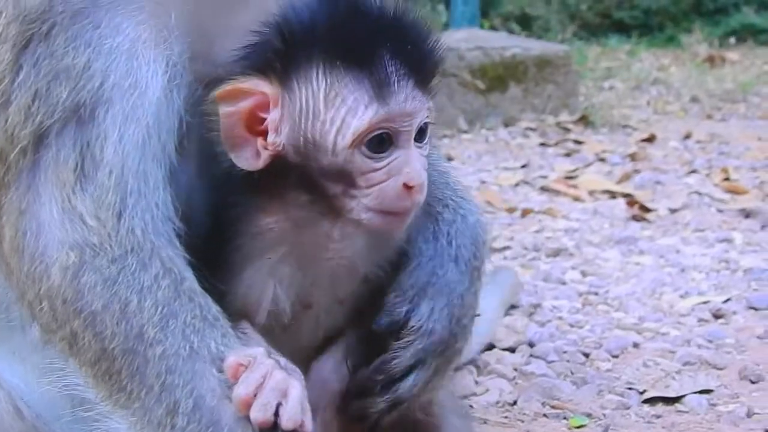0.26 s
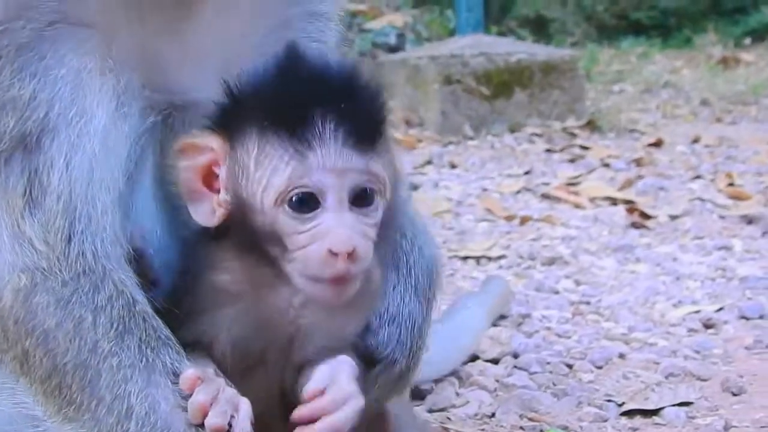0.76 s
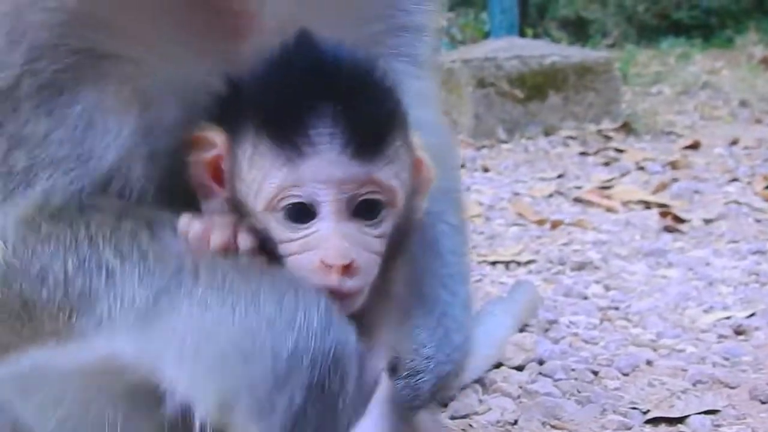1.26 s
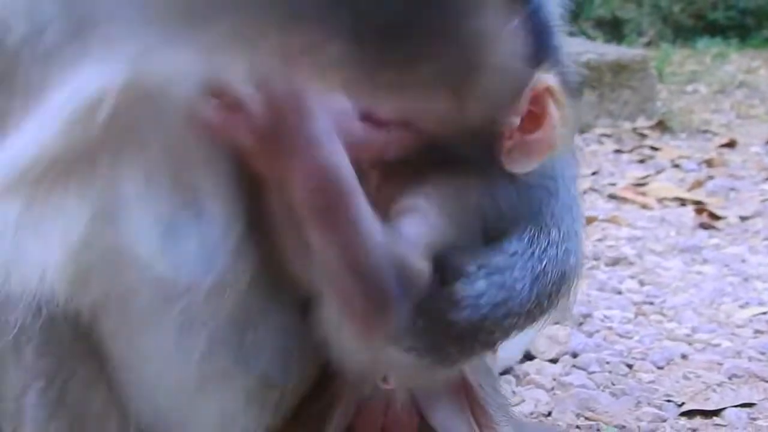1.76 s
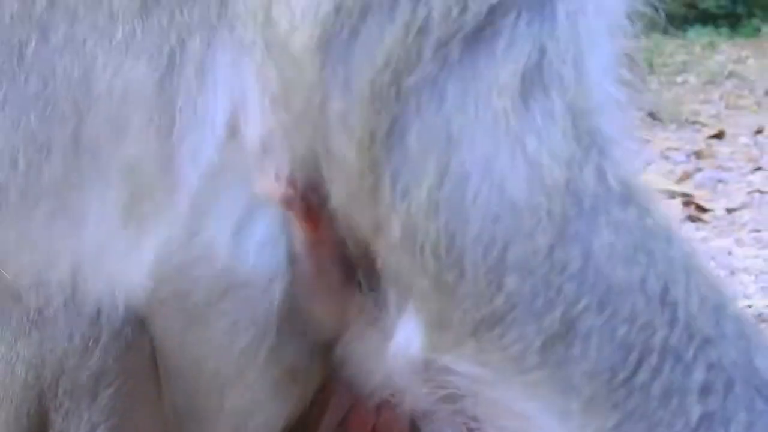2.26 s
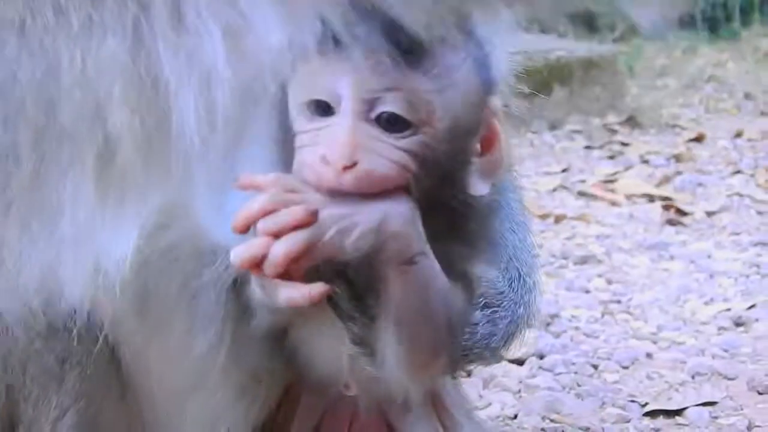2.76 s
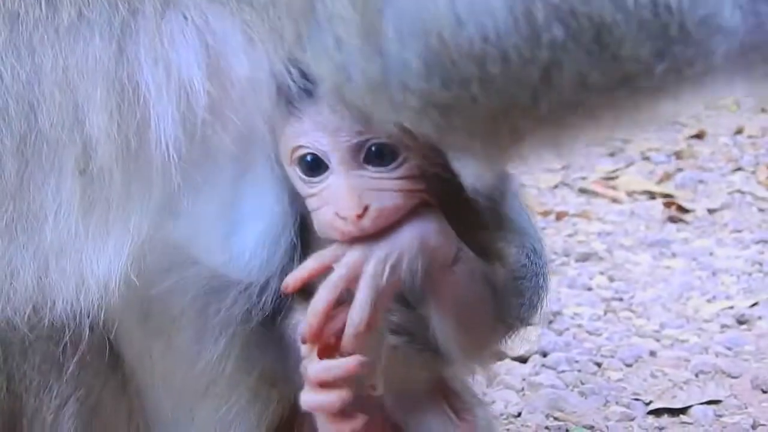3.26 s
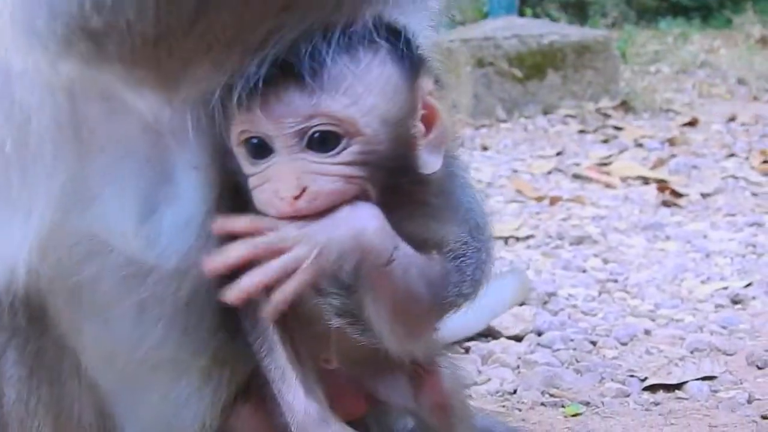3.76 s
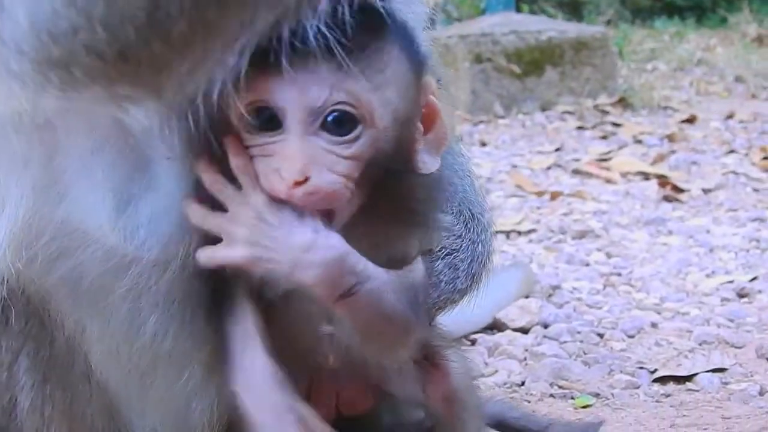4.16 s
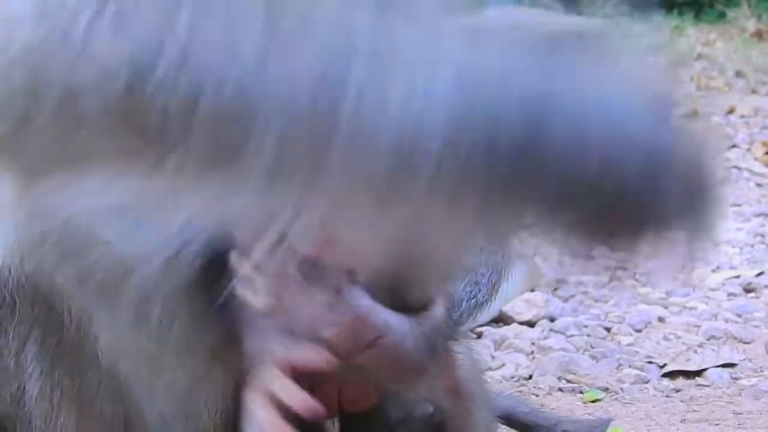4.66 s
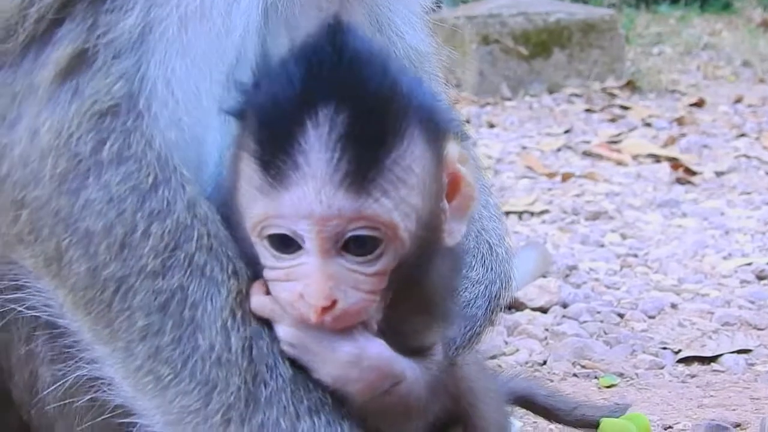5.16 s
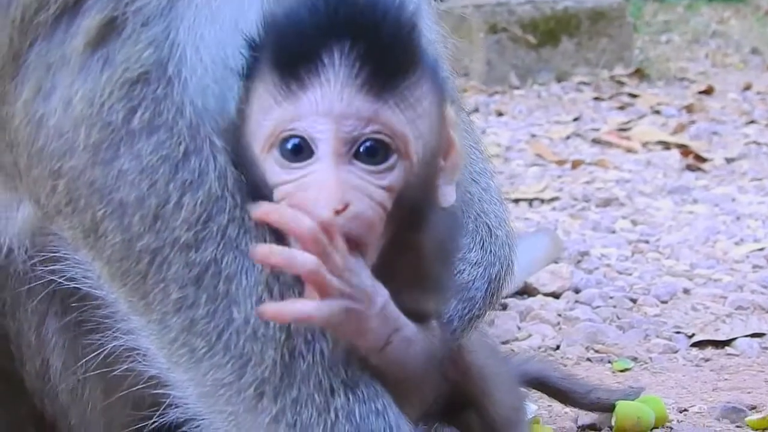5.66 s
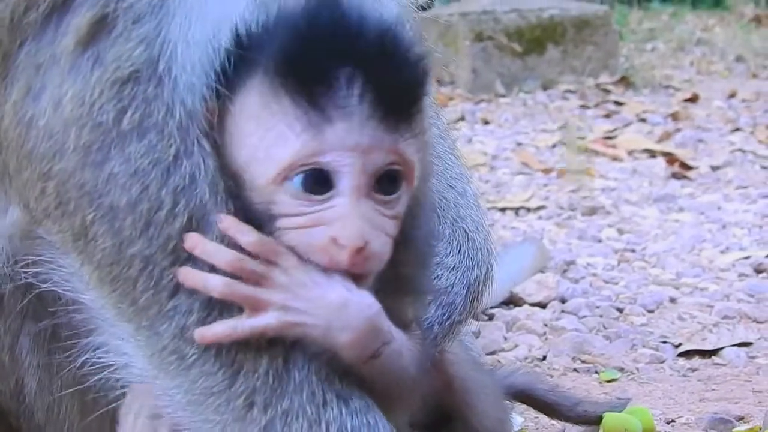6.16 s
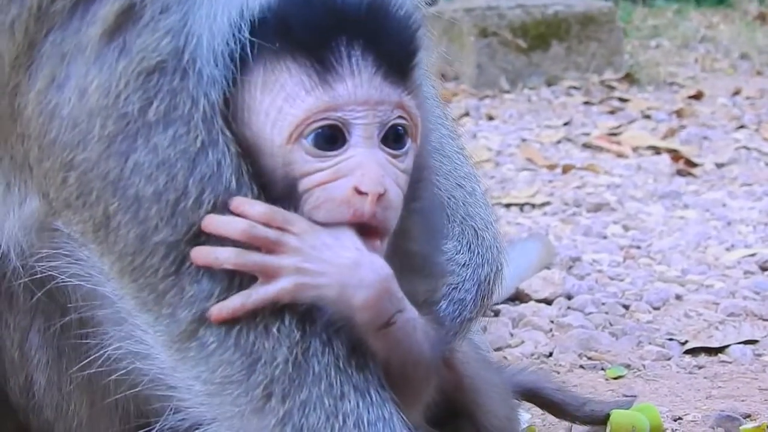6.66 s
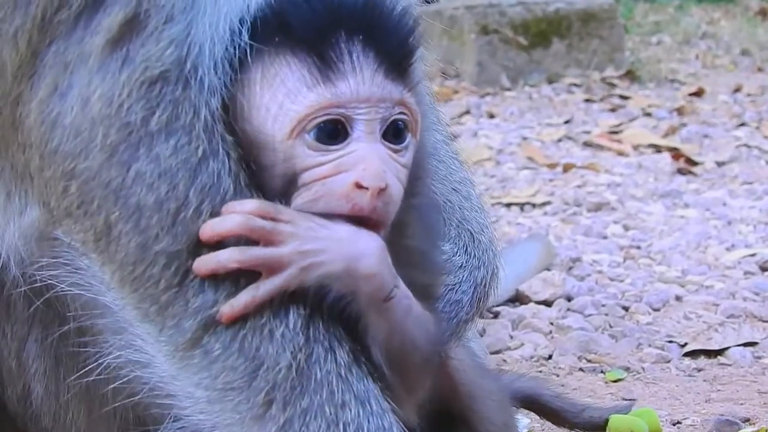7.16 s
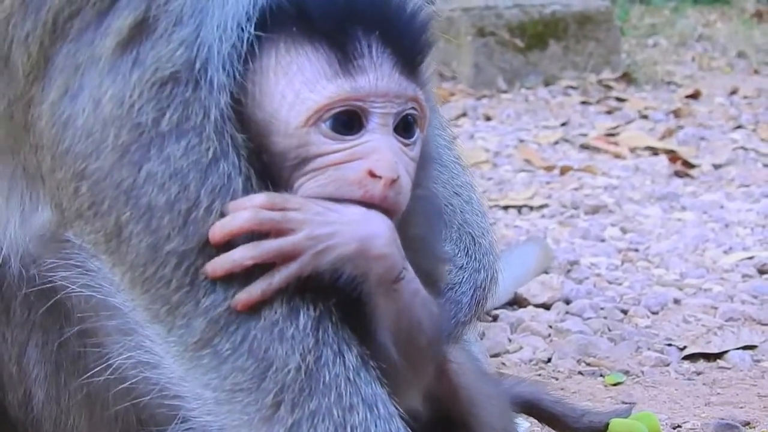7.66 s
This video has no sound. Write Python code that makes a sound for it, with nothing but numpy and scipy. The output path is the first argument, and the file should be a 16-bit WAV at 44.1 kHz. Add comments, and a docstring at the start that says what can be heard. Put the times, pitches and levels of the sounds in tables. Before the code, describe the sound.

A quiet stony clearing by a road, with a steady low rumble of distant traffic and a faint, wavering insect whine throughout. At the start a single-cylinder motorbike chugs away, its lumpy low beat loudest in the first second, then thinner, echoing off trees and mostly gone by 5.5 seconds. A soft bump and tiny gritty scuffs sound close by between 0.3 and 0.6 seconds, with another bump near 5.5. A second motorbike drones closer, swelling from about 5 seconds and passing at around 6.4 with booming exhaust pulses, tyre roar, a rasping growl, brief gear whines and ticking valves. Its pitch drops as it goes by and it begins to fade. A few small crunches of grit come near 7.8 seconds. The left side of the microphone is covered, so nearly everything is heard on the right, with faint hiss on both sides.

```python
"""A quiet stony clearing by a road: one single-cylinder motorbike chugs away, another comes up and passes.
Exhaust pulses boom through the silencers over tyre roar and echo off the trees. The passing bike clears
the bushes and drops in pitch as it goes by, its cavities growling, gears whining and valves ticking.
Insects whine in the trees, grit stirs close by and distant traffic rumbles. The left microphone port
is covered, so nearly everything but the hiss is heard on the right."""
import sys
import numpy as np
from scipy import signal
from scipy.fft import rfft, irfft, next_fast_len
from scipy.io import wavfile
from scipy.ndimage import uniform_filter1d, map_coordinates

SR = 44100
rng = np.random.default_rng(int(sys.argv[2]) if len(sys.argv) > 2 else 0)


def generate_wav(sig):
    """Save sig (samples, or channels by samples) to the path in sys.argv[1] as 16-bit PCM at SR."""
    pcm = np.round(np.clip(np.atleast_2d(sig).T, -1, 1) * 32767).astype(np.int16)
    wavfile.write(sys.argv[1], SR, pcm)


N = 348831
TIME = np.arange(N) / SR
CLOSEST_S, SPEED_M_S, DISTANCE_M = 6.38, 15.2, 5.3  # the passing bike's straight line

# road roar of both bikes: f/Hz, relative level/dB
ROAR_EQ = [(25, -23.5), (50, 3), (90, 12), (160, 9.5), (230, 3.5), (310, -1), (420, 0), (520, -4.5),
           (630, -8.5), (770, -19.5), (1100, -19), (2000, -50.5), (8000, -80.5)]


def undb(db):
    """Decibels to gain."""
    return 10 ** (np.asarray(db) / 20)


def unit(x):
    """Scale to an rms of one."""
    return x / np.sqrt(np.mean(x ** 2))


def automation(points):
    """Join (t/s, value) points with straight lines."""
    return np.interp(TIME, *np.transpose(points))


def colour(x, points):
    """Minimum-phase EQ through (f/Hz, gain/dB) points, built from the cepstrum."""
    size = next_fast_len(N + SR // 2) * 2
    hz, db = np.transpose(points)
    gain = undb(np.interp(np.log(np.fft.rfftfreq(size, 1 / SR) + 1), np.log(hz), db))
    cepstrum = irfft(np.log(gain))[:size // 2]
    cepstrum[1:] *= 2
    return irfft(rfft(x, size) * np.exp(rfft(cepstrum, size)))[..., :N]


def shade(x, points):
    """Zero-phase EQ through (f/Hz, gain/dB) points."""
    hz, db = np.transpose(points)
    size = next_fast_len(N + SR // 2)
    gain = undb(np.interp(np.fft.rfftfreq(size, 1 / SR), hz, db))
    return irfft(rfft(x, size) * gain, size)[:N]


def band(x, hz, width_hz):
    """A steep band-pass around one resonance."""
    spread = 1 + width_hz / hz / 2
    edges = [hz / spread, min(hz * spread, SR / 4)]
    return signal.sosfilt(signal.butter(3, edges, "band", fs=SR, output="sos"), x)


def noise(points):
    """Coloured noise, unrelated left and right."""
    return unit(colour(rng.standard_normal((2, N)), points))


def drift(rate_hz):
    """Smooth random modulation: stepped levels, slewed twice."""
    hold = int(SR / rate_hz)
    steps = np.repeat(rng.standard_normal(N // hold + 2), hold)
    return unit(uniform_filter1d(uniform_filter1d(steps, hold), hold)[:N])


def strokes(hz, lag, scatter_db, jitter_s):
    """One pulse per engine cycle, lag cycles late, each with its own size and timing."""
    cycles = np.cumsum(hz) / SR - lag
    chance = rng.standard_normal((N // 1000, 2))[:int(cycles[-1]) + 1]
    onsets_s = np.interp(np.arange(len(chance)), cycles, TIME) + jitter_s * chance[:, 0]
    return np.bincount(np.clip(onsets_s * SR, 0, N - 1).astype(int), undb(scatter_db * chance[:, 1]), N)


def tail(x, decay_s):
    """Give every pulse an exponential tail."""
    return signal.lfilter([1], [1, -np.exp(-1 / (decay_s * SR))], x)


def rasp(hz):
    """A rough scrape that repeats almost exactly on every engine cycle."""
    grain = rng.standard_normal(SR // 30)
    pulses = strokes(hz, lag=.1, scatter_db=2, jitter_s=.00008)
    return unit(signal.fftconvolve(pulses, grain)[:N])


def along():
    """Metres that the passing bike has gone beyond its closest point."""
    return SPEED_M_S * (TIME - CLOSEST_S)


def nearness():
    """Least distance over present distance of the passing bike."""
    return DISTANCE_M / np.hypot(DISTANCE_M, along())


def rear_view():
    """From -1 with the passing bike head on to 1 with it seen from behind."""
    return along() / np.hypot(DISTANCE_M, along())


def passing_rate():
    """Firing rate as heard: a slowly sagging engine, Doppler-shifted by its motion."""
    firing_hz, sag_hz_per_s = 31.4, .1377
    return (firing_hz - sag_hz_per_s * TIME) / (1 + SPEED_M_S / 343 * rear_view())


def steady_rate():
    """The passing bike's mean firing rate, for layers that are pitch-bent afterwards."""
    return np.full(N, passing_rate().mean())


def doppler(x):
    """Varispeed that follows the heard firing rate: higher coming, lower going."""
    hz = passing_rate()
    position = np.cumsum(hz / hz.mean())
    return np.array([map_coordinates(channel, [position], order=3, mode="nearest") for channel in x])


def beamed(part):
    """Boost or dip in dB as a part of the passing bike sweeps its side lobes past."""
    # lobes of each part: t/s, half width/s, gain/dB
    lobes = {"roar": [(6.25, .6, 1.5)], "clatter": [(6.24, .1, 11)], "valves": [(5.81, .15, 12),
             (6.17, .08, 12)], "airbox": [(6.11, .07, 4.5), (6.32, .05, 2.5), (6.6, .2, 4)],
             "tailpipe": [(6.2, .6, -5)], "gearcase": [(6.1, .05, 4), (6.31, .2, 12)],
             "intake": [(5.86, .13, 6), (6.11, .05, 6)]}
    return sum(db / (1 + np.abs((TIME - s) / half_s) ** 3) for s, half_s, db in lobes.get(part, []))


def carried(part):
    """Gain of a part of the passing bike, from its distance, the side it shows and the bushes between."""
    # each part: base level/dB, loss per doubled distance/dB, rearward gain/dB, loss behind bushes/dB
    reach = {"exhaust": (-15, 7, 1.5, -2), "roar": (-28.5, 5.5, -1.1, -3.5), "tyres": (-48.5, 4, 0.5, 4),
             "tread": (-46.5, 5, -1.5, 4.5), "clatter": (-56, 10, -5.5, -6.5), "valves": (-63, 13, -3, -1),
             "airbox": (-39.5, 5, -3.5, 3.5), "tailpipe": (-44.5, 3.5, 7.5, -3.5),
             "gearcase": (-52, 7.5, -3, 13), "intake": (-51, 11, -7, 17)}
    db, loss_db, rear_db, bushes_db = reach[part]
    emerges_s, crossfade_s = 4.94, .096
    hidden = .5 - .5 * np.tanh((TIME - emerges_s) / crossfade_s)
    open_db = db + loss_db * np.log2(nearness()) + rear_db * rear_view() + beamed(part)
    return undb(open_db - bushes_db * hidden)


def tree_echoes(x):
    """Reflections that come and go as a bike moves past the trees."""
    # echo taps: delay/s, rms gain/dB
    taps = [(0.019, -11.5), (0.028, -8.5), (0.052, -7)]
    return sum(undb(db) * drift(5) * np.interp(TIME - delay_s, TIME, x) for delay_s, db in taps)


def distant_traffic():
    """A steady bed of low rumble from far-off traffic."""
    # rumble: f/Hz, relative level/dB
    rumble_eq = [(20, -61), (38, -20.5), (52, -1), (85, -5), (135, -0.5), (170, -0.5), (210, -17),
                 (290, -16), (400, -34.5), (2000, -65)]
    return noise(rumble_eq) * undb(-33)


def insects():
    """Thin whines that waver in pitch, flutter in level through the leaves and slowly ease off."""
    # each insect: f/Hz, wander/Hz, tremble/Hz, fade/(dB/s), starting level/dB of harmonics 1, 2 and 3
    voices = [(2296, 6, 14, .6, -62, -64.5, -87), (2314, 2, 6, .2, -69, -66, -90),
              (2218, 8, 30, .3, -74, -76, -98)]
    out = np.zeros(N)
    for hz, wander_hz, tremble_hz, fade_db_per_s, *partials_db in voices:
        phase = 2 * np.pi * np.cumsum(hz + wander_hz * drift(14) + tremble_hz * drift(120)) / SR
        for k, db in enumerate(partials_db, 1):
            out += unit(np.sin(k * phase) * undb(3 * drift(70))) * undb(db - fade_db_per_s * TIME)
    return out


def scuffs():
    """Brief bursts of grit and soft bumps close by, each ringing in one broad band."""
    # each scuff: t/s, peak level/dB, f/Hz, width/Hz, decay/s
    hits = [(0.251, -17, 170.5, 69, 0.0029), (0.283, -47, 1370, 403, 0.017), (0.382, -48, 1560, 350, 0.018),
            (.555, -41, 1550, 770, 0.002), (5.453, -15, 153, 79, 0.0062), (7.756, -35, 1700, 950, 0.0097),
            (7.769, -45.5, 3800, 1000, 0.0028), (7.769, -46, 6260, 2200, .005),
            (7.776, -43, 4100, 900, 0.0022), (7.863, -41, 1600, 1600, 0.003),
            (7.875, -44, 4520, 2970, 0.0037)]
    age = np.arange(SR // 8) / SR
    out = np.zeros(N)
    for s, db, hz, width_hz, decay_s in hits:
        burst = band(rng.standard_normal(len(age)) * np.exp(-age / decay_s), hz, width_hz)
        start = int(s * SR)
        out[start:start + len(age)] += (undb(db) * burst / np.abs(burst).max())[:N - start]
    return out


def leaving_bike():
    """A lumpy chug: a strong exhaust beat with a puff of roar, then a weak intake gulp half a cycle on."""
    # the engine eases off, idles along, then picks up a little: t/s, firing rate/Hz
    revs = [(0, 26.2), (1.2, 24.2), (2, 23.95), (4.7, 24.1), (6, 25.4)]
    # loudness of the chug as it draws away: t/s, level/dB
    loudness = [(0, -19), (.95, -21.5), (1.7, -29.5), (2.35, -23), (3.4, -30.5), (4.1, -30), (5.1, -27.5),
                (5.7, -41), (7.9, -33.5)]
    # silencer response: f/Hz, gain/dB
    silencer = [(25, -38), (50, -14), (75, 5.5), (100, -2.5), (128, 0.5), (150, -5), (175, -17), (215, -30),
                (310, -36), (400, -44), (600, -56), (4000, -110)]
    hz = automation(revs)
    exhaust = strokes(hz, lag=.5, scatter_db=2, jitter_s=.0003)
    intake = strokes(hz, lag=1, scatter_db=3, jitter_s=.0006)
    beat = colour(exhaust + undb(-11) * intake, silencer)
    # as it draws away, the deep boom thins and the echoes come up
    boom = automation([(1.12, 1), (2.85, .085)])
    full = beat + undb(-7 * boom) * tree_echoes(beat)
    thin = signal.sosfiltfilt(signal.butter(3, 92, "high", fs=SR, output="sos"), full)
    chug = boom * unit(full) + (1 - boom) * unit(thin)
    puffs = unit(tail(exhaust, decay_s=.0068) + .89)
    roar = unit(colour(puffs * rng.standard_normal((2, N)), ROAR_EQ))
    roar_db, fade_db_per_s = -35, 20.5
    return chug * undb(automation(loudness)) + roar * undb(roar_db - fade_db_per_s * TIME)


def rolling_noise():
    """The passing bike's low roar carries far, tyres rush to the rear and tread hiss is thrown forward."""
    # tyre rush: f/Hz, relative level/dB
    tyre_eq = [(400, -23), (680, -2.5), (800, 11.5), (1000, 5.5), (1130, 0), (1280, -8.5), (1600, -20.5),
               (2500, -25.5), (6000, -43.5), (12000, -78.5)]
    # tread hiss: f/Hz, relative level/dB
    tread_eq = [(900, -12), (1250, -3.5), (1400, -6.5), (1490, -3.5), (1580, -6), (2100, -11), (2800, -15),
                (3400, -17), (4600, -11), (6500, -47.5), (12000, -55)]
    gears = rasp(passing_rate())  # chain and gears, heard mostly close by
    out = doppler(noise(tread_eq)) * carried("tread")
    for part, eq, rasp_db in [("roar", ROAR_EQ, -5.5), ("tyres", tyre_eq, -2.5)]:
        rasp_gain = undb(rasp_db) * np.sqrt(nearness())
        blend = doppler(noise(eq)) + rasp_gain * unit(colour(gears, eq))
        out += blend / np.hypot(1, rasp_gain) * carried(part)
    bumps = undb(.9 * drift(30))
    return out * bumps


def gear_whines():
    """Engine, gear and chain tones locked to the passing engine; each is beamed this way for a moment."""
    # each tone: multiple of the firing rate, loudest t/s, spread/s, level there/dB
    tones = [(4, 4.2, .8, -37), (7, 5.4, .25, -45), (7, 6.05, .15, -37), (8.1, 5.7, .2, -43),
             (25.3, 6.22, .12, -44), (36.5, 6.28, .1, -45), (7, 6.62, .1, -38), (8.45, 6.53, .14, -39),
             (13.25, 6.33, .12, -39), (16.25, 6.37, .1, -40), (19.12, 6.09, .1, -41), (20.7, 6.2, .12, -45),
             (18.15, 6.65, .07, -45), (19.1, 7, .15, -51), (24.9, 7.85, .2, -54)]
    cycles = np.cumsum(passing_rate()) / SR
    out = np.zeros(N)
    for order, s, spread_s, db in tones:
        beam = np.exp(-.5 * ((TIME - s) / spread_s) ** 2)
        tone = np.sin(2 * np.pi * order * cycles + .7 * drift(40))
        out += unit(tone * undb(2.5 * drift(30))) * undb(db) * beam
    return out


def valve_gear():
    """A firm tap and a lighter one in each cycle ring the cylinder head and set loose metal rattling."""
    # cylinder head modes: f/Hz, relative level/dB, t60/s
    modes = [(3370, -15, .1), (3615, -6.5, .04), (3822, -4.5, .048)]
    # rattling engine metal: f/Hz, relative level/dB
    metal_eq = [(1500, -36), (2700, -5), (3400, -8), (3650, 0), (3840, 7.5), (4020, -5.5), (4400, -7),
                (5500, -15), (8000, -26.5), (13000, -46.5)]
    firm = strokes(steady_rate(), lag=.52, scatter_db=1.5, jitter_s=.0008)
    light = strokes(steady_rate(), lag=.63, scatter_db=2, jitter_s=.002)
    taps = firm + undb(-9) * light
    age = np.arange(SR // 20) / SR
    ring = sum(undb(db - 60 * age / t60_s) * np.sin(2 * np.pi * hz * age) for hz, db, t60_s in modes)
    ticks = signal.fftconvolve(taps, ring)[:N]
    rattle = (tail(taps, decay_s=.0047) + .49) * noise(metal_eq)
    return unit(doppler([ticks])) * carried("valves") + unit(doppler(rattle)) * carried("clatter")


def growl():
    """A rasping puff of gas in each cycle rings the airbox, tailpipe, gearcase and intake."""
    # resonances of each cavity: f/Hz, width/Hz, gain/dB
    cavities = {"airbox": [(415.8, 64, -2), (505, 54.3, -1), (591, 86, -1), (804.7, 38, -11)],
                "tailpipe": [(386.3, 78, 1), (714.5, 96, -3.5), (1016, 144, -8.5), (1285, 55, -14.5)],
                "gearcase": [(787, 350, -0.5), (1102, 380, -0.5), (1900, 400, -13.5)],
                "intake": [(1003.4, 80, 0), (1426, 130, -0.5), (1886, 69, -13)]}
    firings = strokes(steady_rate(), lag=.4, scatter_db=1.5, jitter_s=.0005)
    flow = tail(firings, decay_s=.018) + .2  # puffs on a steady stream
    out = 0
    for part, resonances in cavities.items():
        gas = flow * (rng.standard_normal((2, N)) + undb(-3) * rasp(steady_rate()))
        body = sum(undb(db) * band(gas, hz, width_hz) for hz, width_hz, db in resonances)
        out = out + unit(doppler(body)) * carried(part)
    return out


def passing_exhaust():
    """Exhaust and intake make a double beat in each cycle, firm and boomy close by, wavering from afar."""
    # silencer response: f/Hz, gain/dB
    silencer = [(20, -54.5), (31, -8), (45, -7), (61, 0.5), (92, 0), (122, 5), (156, 1.5), (182, -4),
                (207, -17.5), (230, -16.5), (320, -36.5), (700, -38), (4000, -100)]
    # from ahead it drones on a higher note: f/Hz, gain/dB
    head_on_eq = [(62, 0), (96, -2.5), (128, -1), (160, 3.5), (195, -1), (260, 0)]
    hz = passing_rate()
    # exhaust and intake sit at different ends, so their spacing shifts from front view to rear view
    exhaust = strokes(hz, lag=.46, scatter_db=1, jitter_s=.00025)
    intake = strokes(hz, lag=1.04 - .026 * rear_view(), scatter_db=1.1, jitter_s=.0003)
    beat = -unit(colour(exhaust + undb(-1.5) * intake, silencer))
    # moving air bends sound from far off, so its travel time wanders
    wander_s = .0005 * (1 - nearness()) ** 2 * drift(12)
    beat = np.interp(TIME + wander_s, TIME, beat)
    boom = signal.sosfiltfilt(signal.butter(3, 79, fs=SR, output="sos"), beat)
    beat = beat + undb(-19) * nearness() * boom + (1 - nearness()) * tree_echoes(beat)
    ahead = np.minimum(rear_view(), 0) ** 2
    beat = ahead * shade(beat, head_on_eq) + (1 - ahead) * beat
    return beat * carried("exhaust")


def scene():
    """Both bikes and the ambience as they arrive at the two ports."""
    bikes = leaving_bike() + passing_exhaust() + valve_gear() + gear_whines() + rolling_noise()
    return bikes + distant_traffic() + growl() + insects() + scuffs()


def record(dry):
    """The covered left port is faint and thin; low rumble and hiss lie under both; the top is cut."""
    # what passes the covered port: f/Hz, gain/dB
    cover_eq = [(30, -33.5), (120, -34), (250, -39.5), (600, -37), (1200, -23), (2300, -16.5), (3700, -4),
                (4600, -18.5), (7000, -21), (12000, -18)]
    # noise floor: f/Hz, relative level/dB
    hiss_eq = [(25, 2.5), (60, 16), (150, 19), (240, 12.5), (500, 7), (1000, 3.5), (2000, 1.5), (4200, 1),
               (6000, -2.5), (8000, -5.5), (10000, -9), (11500, -12), (12400, -22), (14000, -42.5)]
    top_hz = 13450
    ports = np.array([colour(dry[0], cover_eq), dry[1]]) + undb(-55) * noise(hiss_eq)
    return signal.sosfilt(signal.ellip(8, .2, 70, top_hz, fs=SR, output="sos"), ports)


dry = scene()
out = record(dry)
generate_wav(out)
```